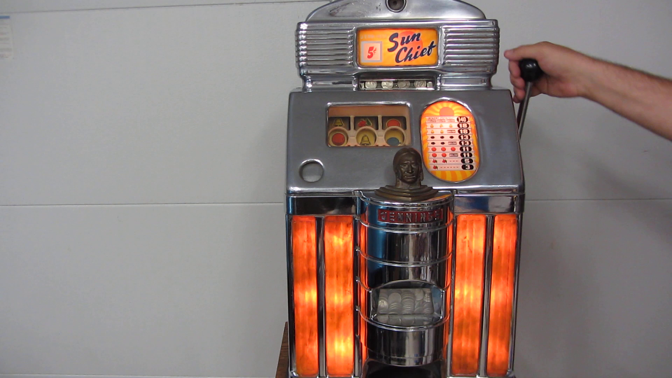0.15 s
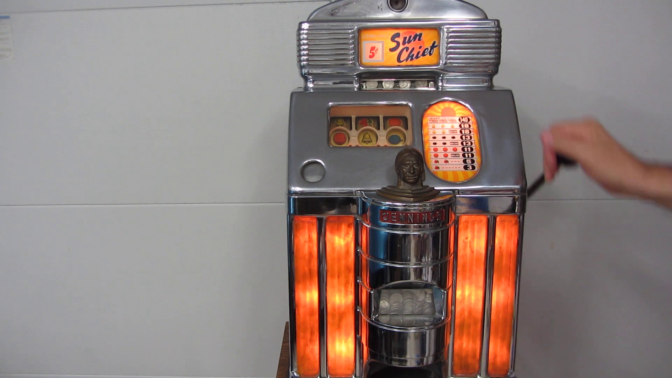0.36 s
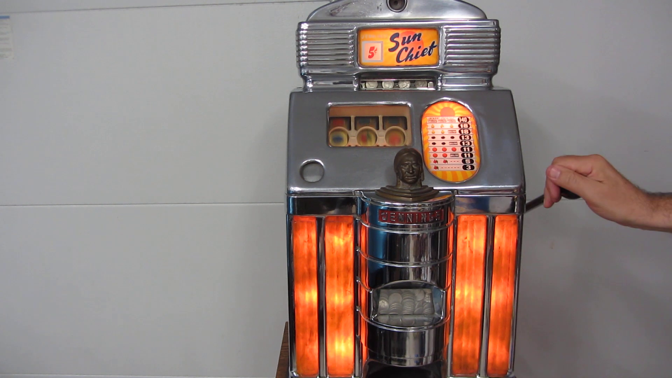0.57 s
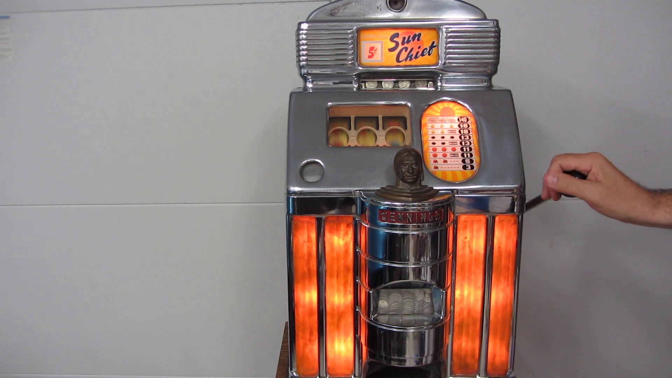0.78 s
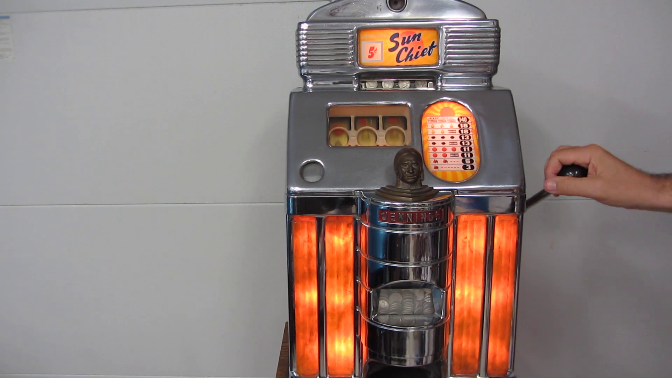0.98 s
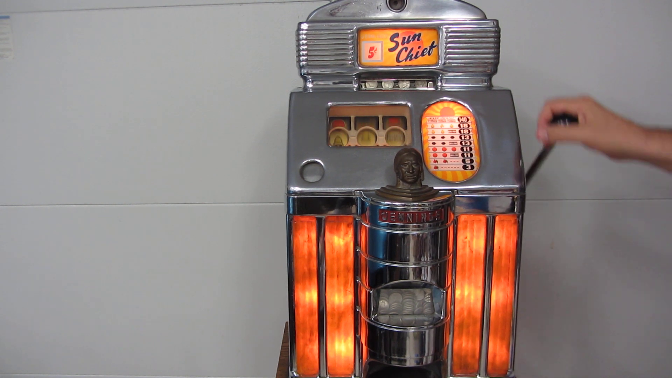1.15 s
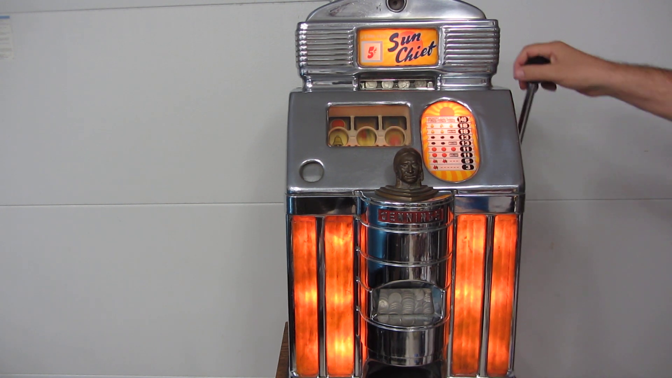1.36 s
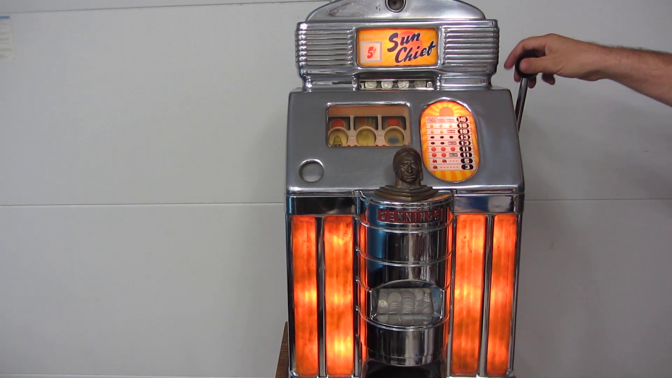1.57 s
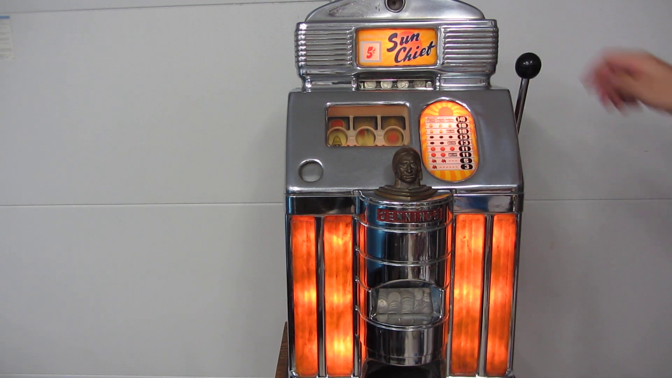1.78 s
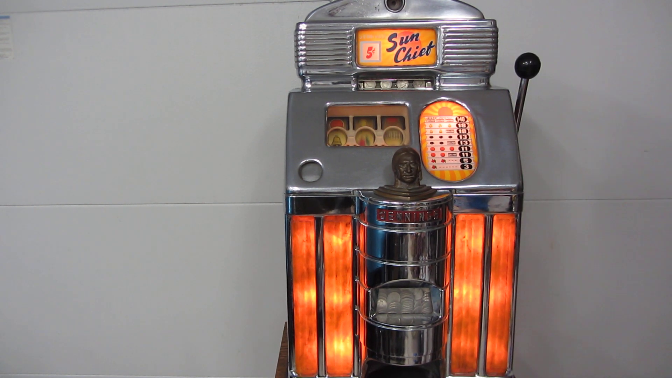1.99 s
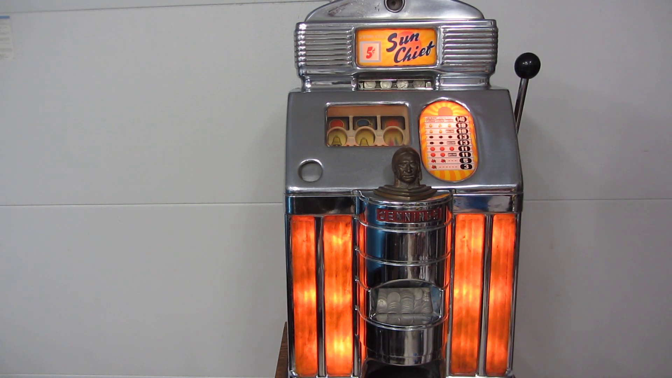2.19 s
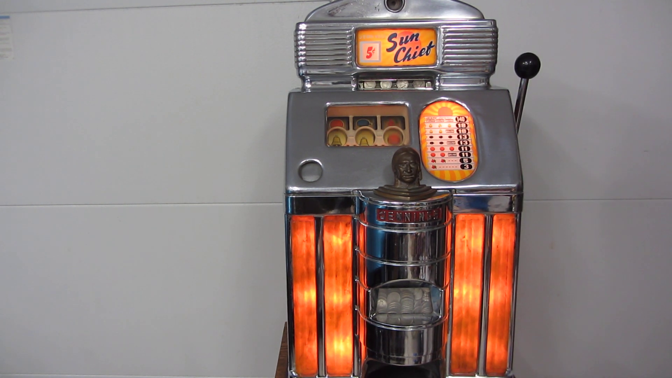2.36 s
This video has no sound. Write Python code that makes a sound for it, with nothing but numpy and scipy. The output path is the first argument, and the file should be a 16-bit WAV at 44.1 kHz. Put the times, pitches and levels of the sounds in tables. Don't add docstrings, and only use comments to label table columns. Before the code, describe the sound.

Metal slot machine handle pulled with hard chattering clanks, then clicking reel stops in a bare room

```python
import sys
import numpy as np
from scipy import signal
from scipy.fft import rfft, irfft
from scipy.io import wavfile

SR = 44100
rng = np.random.default_rng(int(sys.argv[2]) if len(sys.argv) > 2 else 0)


def file_out(sig):
    cols = np.atleast_2d(sig).T
    lim = np.clip(cols, -1, 1)
    pcm = np.round(lim * 32767).astype(np.int16)
    wavfile.write(sys.argv[1], SR, pcm)


def gain_from_db(level_db):
    decades = np.asarray(level_db, float) / 20
    return 10 ** decades


N = 110250

# start_s, peak_db, case_over_steel_db, ring_hz, chatter_s
PULL_KNOCKS = [
    (0.2387, -19.5, -4, 4640, 0.0038),
    (0.2505, -13, -3.5, 5860, 0.013),
    (0.2906, -6.5, -27, 4450, 0.0061),
    (0.309, -10.5, -21, 2820, 0.029),
    (0.3606, -3, -28, 4070, 0.0056),
    (0.378, -13, -15, 3000, 0.0098),
    (0.4, -11, -7, 2340, 0.015),
    (0.4705, -5, -3, 2300, 0.01),
    (0.484, -11.5, -10, 5350, 0.013),
    (0.498, -14.5, -6, 2270, 0.0032),
]
# start_s, peak_db, case_over_steel_db, ring_hz, chatter_s
BLUNT_KNOCKS = [
    (0.2028, -13, 4, 1030, 0.0047),
    (0.217, -21, 8, 910, 0.0052),
    (0.2719, -8, 7, 1400, 0.0052),
    (0.281, -14.5, -6, 1080, 0.0032),
    (0.4375, -5, 0, 1770, 0.003),
    (0.448, -11, -3.5, 2010, 0.0077),
    (0.558, -23, 4, 1980, 0.0096),
    (0.577, -18, 6.5, 1840, 0.006),
]
# start_s, peak_db, case_over_steel_db, ring_hz,
# chatter_s
RETURN_KNOCKS = [
    (0.1546, -37, 2, 1520, 0.016),
    (0.8314, -31.5, 4.5, 2420, 0.018),
    (0.8822, -37, -7, 1470, 0.022),
    (0.9781, -37.5, 3, 2840, 0.012),
    (0.9926, -16, -2, 3040, 0.0028),
    (1.067, -15, -1, 2880, 0.011),
    (1.1815, -28.5, -13.5, 1960, 0.011),
    (1.2157, -31.5, -14, 2080, 0.011),
    (1.236, -23.5, 3, 2050, 0.011),
    (1.3187, -33, 6.5, 2280, 0.059),
]
# start_s, peak_db, case_over_steel_db, ring_hz, chatter_s
STOP_KNOCKS = [(1.3649, -5.5, -5.5, 3640, 0.013), (1.4098, -19, -8, 3140, 0.0093),
               (1.469, -17.5, -43, 2400, 0.015), (1.499, -20, -33, 2180, 0.009),
               (1.536, -22.5, -45, 2450, 0.019), (1.5835, -29, -40.5, 3800, 0.0041),
               (1.728, -25.5, -14, 3670, 0.014), (1.7629, -31.5, -9.5, 2080, 0.008),
               (1.79, -29.5, -15, 3730, 0.0081), (1.8158, -23.5, -14, 2240, 0.0077),
               (1.8532, -24.5, -15, 2150, 0.016), (1.92, -21.5, -44, 4700, 0.0018),
               (1.928, -20, -16.5, 4600, 0.004), (1.9505, -10.5, -39, 2240, 0.0024),
               (1.9609, -15, -34, 3700, 0.0044), (2.0058, -21.5, -32, 1880, 0.003),
               (2.029, -32.5, -12, 3380, 0.002)]
# start_s, peak_db, case_over_steel_db, ring_hz, chatter_s
LAST_KNOCKS = [
    (2.0842, -10, -10.5, 2860, 0.013),
    (2.0954, -16.5, -29, 2800, 0.0042),
    (2.163, -17, -4.5, 3130, 0.01),
    (2.2394, -31.5, 2.5, 1660, 0.0038),
]
KNOCK_TOP_HZ = (16000, 4400, 7730, 16400, 10400)
KNOCK_RING_DB = (-3, -2.5, -3.5, -4.5, -1.5)
KNOCK_TAIL_DB = (-7.5, 0, -3, -6.5, -7)
KNOCK_FADE_T60_S = (.05, 0.063, 0.095, 0.055, 0.081)
# pitch_hz, level_db, t60_s
FRAME_MODES = [(490, -6, 0.27), (738, -5.5, 0.05), (951.6, -13, 0.18), (1470, -6.5, 0.16),
               (1684, -12, 0.22), (1980, -11, 0.31), (2215, -13.5, 0.23), (2342, -9.5, 0.35),
               (2775, -10, 0.36), (2927, -5, 0.15), (3375, -6, 0.16), (3720, -7.5, 0.11),
               (6080, 1.5, 0.052), (8200, -16, 0.033)]
# freq_hz, density_db_per_hz
STEEL_SPECTRUM = [(600, -14), (1100, 2), (2000, -1), (4000, -3.5), (7000, -1.5), (10000, -5.5),
                  (12500, -17.5), (14500, -10), (16000, -21)]
# freq_hz, density_db_per_hz
CASE_SPECTRUM = [(130, -28.5), (250, 4), (450, 3.5), (680, 3.5), (1000, -2.5), (1900, -32.5)]
# start_s, pitch_hz, level_db, t60_s
RINGING_PARTS = [(0.208, 13950, -39.5, 0.19), (.25, 13800, -31, 0.2), (.725, 6541, -55.5, 0.28),
                 (.74, 4140, -62, 0.75), (.74, 3190, -60, 0.67), (.996, 2940, -25.5, 0.11),
                 (.996, 8200, -30, 0.039), (1.375, 931, -8, 0.025), (1.585, 3570, -64.5, 0.17),
                 (1.642, 3830, -45, 0.055), (1.664, 3730, -47, 0.073), (1.693, 3680, -51.5, 0.12),
                 (1.951, 690, -19, .035), (1.068, 1723, -30, 0.11), (1.412, 935, -19.5, 0.06),
                 (1.815, 5300, -32.5, 0.085), (1.469, 3480, -26.5, 0.063), (1.469, 5130, -29, 0.057),
                 (1.469, 6000, -25, 0.037), (.2035, 782, -13, 0.034), (1.855, 8500, -37, 0.05),
                 (.4, 11400, -29, 0.071), (1.73, 3720, -56, .3), (.25, 9200, -31, .06),
                 (.316, 10020, -22, 0.067), (.996, 3380, -20.5, 0.045), (.996, 6000, -32, 0.04),
                 (1.07, 457, -28.5, 0.086), (1.07, 8340, -20, 0.036), (2.086, 7890, -16, 0.043),
                 (2.164, 8260, -22, 0.061), (1.985, 15000, -57, 0.18), (.6, 14100, -50, 0.3),
                 (1.956, 3375, -12.5, 0.031), (1.968, 823, -25, 0.1), (1.965, 2190, -38, 0.11),
                 (2.01, 3450, -49, 0.61), (2.086, 2970, -18, 0.12), (2.086, 3310, -20, 0.13),
                 (2.09, 1470, -27, 0.11), (2.095, 481, -24, 0.17), (2.17, 1548, -29, 0.15)]
# time_s, level_db
RATTLE_LEVEL = [
    (0.204, -38.5),
    (.3, -24.5),
    (.5, -32),
    (.6, -33.5),
    (0.679, -49.5),
    (.78, -61.5),
]
# start_s, level_db, boom_hz
CABINET_PUSHES = [(0.207, -20.5, 132.2), (0.27, -16.5, 140.4), (0.31, -16, 163), (0.442, -19.5, 149),
                  (0.499, -13, 155.8), (0.561, -21, 134.5), (0.641, -30, 132), (1.002, -36, 124),
                  (1.079, -21.5, 129.8), (1.182, -32.5, 135), (1.243, -22, 152.5), (1.322, -29, 137),
                  (1.369, -20, 154.2), (1.444, -26.5, 143), (1.492, -41, 137), (1.732, -37, 144),
                  (1.998, -35, 130.6), (2.097, -22, 139.7), (2.19, -23.5, 138.3)]
# freq_hz, density_db_per_hz
AIR_SPECTRUM = [(15, -38), (25, -39.5), (123, -1.5), (212, -8), (242, -10.5), (1260, -19.5), (2110, -20.5),
                (2280, -23), (16000, -51.5)]
# freq_hz, t60_s
ROOM_DECAY = [(100, 0.66), (500, 0.72), (2000, 0.35), (8000, 0.36), (15000, 0.34)]
# freq_hz, side_over_mid_db
WIDTH_SPECTRUM = [(60, -2), (140, -12.5), (300, -9), (550, -9.5), (1650, -6), (4970, -4.5), (15000, 2.5)]

AIR_DB = -53.5
HUM_HZ, HUM_DB, HUM_WIDTH_HZ = 111.4, -56, 29
BUZZ_HZ, BUZZ_DB, BUZZ_WIDTH_HZ = 2150, -65, 280
CHATTER_PER_S, GRAIN_SPREAD_DB = 7000, 1
STRIKE_DB, STRIKE_T_S, STRIKE_RISE_S = 8.5, 0.0015, 0.00057
RING_WIDTH_PER_HZ = 0.5
SOFT_DULLS_DB_PER_DB = 0.16
TAIL_T60_S, TAIL_TOP_HZ = 0.31, 7000
PART_DB, PART_T60_S, PART_SPREAD_DB = -8.5, 0.07, 8.5
FRAME_DB, FRAME_SPREAD_DB = -8.5, 4.5
CASE_DELAY_S, CASE_STRETCH, CASE_T60_S, CASE_DB = 0.001972, 2.02, 0.15, -14.5
RING_RISE_S, RING_WOBBLE_DB, RING_SPREAD_PER_HZ = 0.0031, 5.5, 0.045
RATTLE_PER_S, RATTLE_CASE_DB, RATTLE_TOP_HZ = 990, 0, 9000
BOOM_T60_S, BOOM_RISE_S = 0.22, 0.0055
BOOM_RATIOS, BOOM_RATIOS_DB = (1, 1.37, 0.52), (0, -9, -22.5)
ROOM_DB, RINGS_IN_ROOM_DB = -12, -8
SIDE_DB, LEFT_OVER_RIGHT_DB = -1, -0.85
NEAR_SHARE, NEAR_T60_S = 0.067, 0.024


def rms_one(x):
    return x / np.sqrt(np.mean(x ** 2) + 1e-20)


def colour(x, points):
    hz, db = np.transpose(points)
    grid_hz = np.maximum(np.fft.rfftfreq(4096, 1 / SR), 1)
    cepstrum = irfft(np.interp(np.log(grid_hz), np.log(hz), db) * np.log(10) / 20)
    cepstrum[1:2048] *= 2
    cepstrum[2049:] = 0
    taps = irfft(np.exp(rfft(cepstrum)))
    return signal.fftconvolve(np.atleast_2d(x), taps[None], axes=1)[:, :N]


def resonance(x, hz, width_hz):
    r = np.exp(-np.pi * width_hz / SR)
    zeros = np.array([1, 0, -1]) * (1 - r * r) / 2
    poles = [1, -2 * r * np.cos(2 * np.pi * hz / SR), r * r]
    return signal.lfilter(zeros, poles, x)


def double_resonance(x, hz, width_hz):
    return resonance(resonance(x, hz, width_hz), hz, width_hz)


def add(out, x, start_s):
    i = int(start_s * SR)
    out[..., i:i + x.shape[-1]] += x[..., :out.shape[-1] - i]


def background():
    air = rms_one(colour(rng.standard_normal((2, N)), AIR_SPECTRUM))
    hum = rms_one(resonance(rng.standard_normal((2, N)), HUM_HZ, HUM_WIDTH_HZ))
    buzz = rms_one(double_resonance(rng.standard_normal((2, N)), BUZZ_HZ, BUZZ_WIDTH_HZ))
    return gain_from_db(AIR_DB) * air + gain_from_db(HUM_DB) * hum + gain_from_db(BUZZ_DB) * buzz


def grains(size, per_s):
    struck = rng.random(size) < per_s / SR
    hit = struck * gain_from_db(GRAIN_SPREAD_DB * np.minimum(rng.exponential(1, size), 3.1))
    return rms_one(rng.standard_normal((2, size)) * (hit + 0.47))


def strike(hz, db, t60_s, t):
    out = np.zeros((2, len(t)))
    t = t[:len(t) // 3]
    fade = gain_from_db(db - 60 * t / t60_s) * np.minimum(t / 0.0023, 1) * (1 - (t / t[-1]) ** 2)
    for row, phase in zip(out, rng.random((2, len(hz), 1))):
        row[:len(t)] = np.sum(fade * np.sin(2 * np.pi * (hz * t + phase)), axis=0)
    return out


def part_modes(t):
    place, size, life = rng.random((3, 14, 1))
    db = PART_DB + PART_SPREAD_DB * (2 * size - 1)
    return strike(1700 * 6 ** place, db, PART_T60_S * (0.5 + life), t)


def frame_modes(t):
    hz, db, t60_s = np.transpose(FRAME_MODES)[..., None]
    size, bend = rng.random((2, len(FRAME_MODES), 1))
    db = FRAME_DB + db + FRAME_SPREAD_DB * (2 * size - 1)
    return strike(hz * (1 + 0.014 * (bend - 0.5)), db, t60_s, t)


def steel_knock(t, peak_db, ring_hz, hold_s, top_hz, ring_db, tail_db, fade_s):
    chatter = grains(len(t), CHATTER_PER_S)
    chatter = chatter / np.std(chatter[:, t < hold_s], axis=1, keepdims=True)
    chatter[0, 12] = 7
    level_db = STRIKE_DB * np.exp(-t / STRIKE_T_S) - 60 * np.maximum(t - hold_s, 0) / fade_s
    contact = chatter * np.minimum(t / STRIKE_RISE_S, 1) * gain_from_db(level_db)
    tail = signal.lfilter(*signal.butter(2, TAIL_TOP_HZ, fs=SR), chatter)
    tail = tail * gain_from_db(tail_db - 60 * t / TAIL_T60_S) * np.minimum(t / hold_s, 1)
    tone = double_resonance(contact, ring_hz, ring_hz * RING_WIDTH_PER_HZ)
    tone = tone * gain_from_db(ring_db) * np.sqrt(20000 / ring_hz)
    knock = contact + tail + tone + part_modes(t) + frame_modes(t)
    top_hz = min(top_hz * gain_from_db(SOFT_DULLS_DB_PER_DB * (peak_db + 15)), 20000)
    dull = signal.butter(3, top_hz, fs=SR, output="sos")
    return gain_from_db(peak_db - 16) * signal.sosfilt(dull, knock)


def case_push(t, hold_s):
    fade = gain_from_db(-60 * np.maximum(t - hold_s * CASE_STRETCH, 0) / CASE_T60_S)
    return rng.standard_normal((2, len(t))) * np.minimum(t / 0.0018, 1) * fade


def knocks():
    steel, case = np.zeros((2, N)), np.zeros((2, N))
    t = np.arange(int(0.4 * SR)) / SR
    tables = (PULL_KNOCKS, BLUNT_KNOCKS, RETURN_KNOCKS, STOP_KNOCKS, LAST_KNOCKS)
    settings = zip(KNOCK_TOP_HZ, KNOCK_RING_DB, KNOCK_TAIL_DB, KNOCK_FADE_T60_S)
    for table, setting in zip(tables, settings):
        for start_s, peak_db, case_db, ring_hz, hold_s in table:
            add(steel, steel_knock(t, peak_db, ring_hz, hold_s, *setting), start_s)
            push = gain_from_db(peak_db + case_db + CASE_DB) * case_push(t, hold_s)
            add(case, push, start_s + CASE_DELAY_S)
    return steel, case


def rings():
    out = np.zeros((2, N))
    for start_s, hz, db, t60_s in RINGING_PARTS:
        t = np.arange(int(min(t60_s, 0.6) * SR)) / SR
        wobble = np.interp(t, np.linspace(0, 0.6, 90), rng.standard_normal(90))
        below, above = rng.uniform(0.4, 1, 2) * [-1, 1]
        tone = 0
        for offset, gain in ((0, 0.8), (below, 0.55), (above, 0.55)):
            line_hz = hz * (1 + RING_SPREAD_PER_HZ / 2 * offset)
            tone = tone + gain * np.sin(2 * np.pi * (line_hz * t + rng.random((2, 1))))
        level = gain_from_db(db - 60 * t / t60_s + RING_WOBBLE_DB * wobble)
        add(out, level * (1 - np.exp(-t / RING_RISE_S)) * tone, start_s)
    return out


def rattle():
    s, db = np.transpose(RATTLE_LEVEL)
    time_s, level_db = [*s, s[-1] + 0.066], [*db, db[-1] - 47]
    level = gain_from_db(np.interp(np.arange(N) / SR, time_s, level_db, left=-120))
    loose = signal.lfilter(*signal.butter(2, RATTLE_TOP_HZ, fs=SR), grains(N, RATTLE_PER_S))
    return level * loose, level * gain_from_db(RATTLE_CASE_DB) * rng.standard_normal((2, N))


def steel_ring(x):
    gain = 1 / np.std(colour(rng.standard_normal(N), STEEL_SPECTRUM))
    low_cut = signal.butter(4, 550, "high", fs=SR, output="sos")
    return signal.sosfilt(low_cut, gain * colour(x, STEEL_SPECTRUM))


def case_ring(x):
    return colour(x, CASE_SPECTRUM) / np.std(colour(rng.standard_normal(N), CASE_SPECTRUM))


def cabinet():
    out, t = np.zeros((2, N)), np.arange(int(0.7 * SR)) / SR
    for start_s, db, hz in CABINET_PUSHES:
        tone = 0
        for ratio, ratio_db in zip(BOOM_RATIOS, BOOM_RATIOS_DB):
            phase = rng.uniform(0, 2 * np.pi) + np.array([[0], [0.32]])
            tone = tone + gain_from_db(ratio_db) * np.sin(2 * np.pi * hz * ratio * t + phase)
        add(out, gain_from_db(db - 60 * t / BOOM_T60_S) * (1 - np.exp(-t / BOOM_RISE_S)) * tone, start_s)
    return out


def room(x):
    t, tail = np.arange(int(0.7 * SR)) / SR, 0
    hz, t60_s = np.transpose(ROOM_DECAY)
    for low_hz in 60 * 2. ** np.arange(8):
        octave = signal.butter(2, [low_hz, 2 * low_hz], "band", fs=SR, output="sos")
        band = signal.sosfilt(octave, rng.standard_normal((2, len(t))))
        band_t60_s = np.interp(np.log(low_hz * np.sqrt(2)), np.log(hz), t60_s)
        tail = tail + band * gain_from_db(-60 * t / band_t60_s)
    tail = tail * np.minimum(t / 0.042, 1)
    return signal.fftconvolve(x[None], tail / np.sqrt(np.sum(tail[0] ** 2)), axes=1)[:, :N]


def widen(mid, side):
    t = np.arange(1000) / SR
    near = rng.standard_normal(len(t)) * gain_from_db(-60 * t / NEAR_T60_S)
    reflected = signal.fftconvolve(mid, near / np.linalg.norm(near))[:N]
    mix = np.sqrt(1 - NEAR_SHARE) * side + np.sqrt(NEAR_SHARE) * reflected
    return gain_from_db(SIDE_DB) * colour(mix, WIDTH_SPECTRUM)[0]


def scene():
    steel, case = knocks()
    ringing = rings()
    loose, shake = rattle()
    machine = steel_ring(steel + loose) + case_ring(case + shake) + cabinet()
    reverb = room(machine[0] + gain_from_db(RINGS_IN_ROOM_DB) * ringing[0])
    mid, side = machine + ringing + gain_from_db(ROOM_DB) * reverb + background()
    side = widen(mid, side)
    left = gain_from_db(LEFT_OVER_RIGHT_DB / 2) * (mid + side)
    right = gain_from_db(-LEFT_OVER_RIGHT_DB / 2) * (mid - side)
    return np.array([left, right])


def top_cut(x):
    return signal.sosfilt(signal.butter(12, 16440, fs=SR, output="sos"), x)


def record(dry):
    x = signal.sosfilt(signal.butter(3, 75, "high", fs=SR, output="sos"), dry)
    x = 0.8 * np.tanh(x / 0.8)
    x = signal.sosfilt(signal.cheby2(12, 50, 16400, fs=SR, output="sos"), x)
    return top_cut(x)


dry = scene()
out = record(dry)
file_out(out)
```